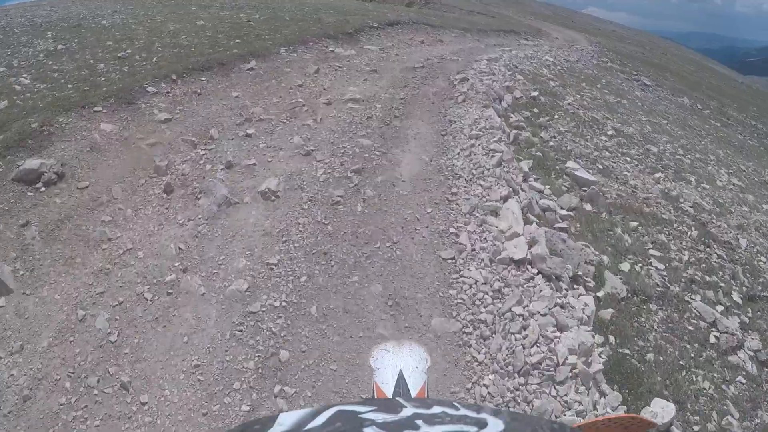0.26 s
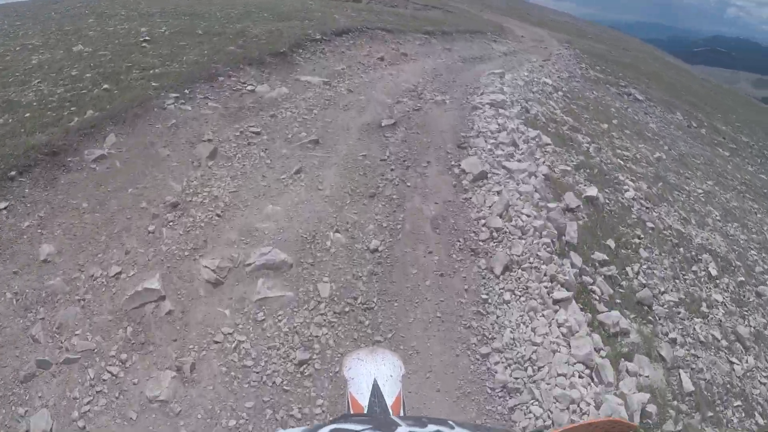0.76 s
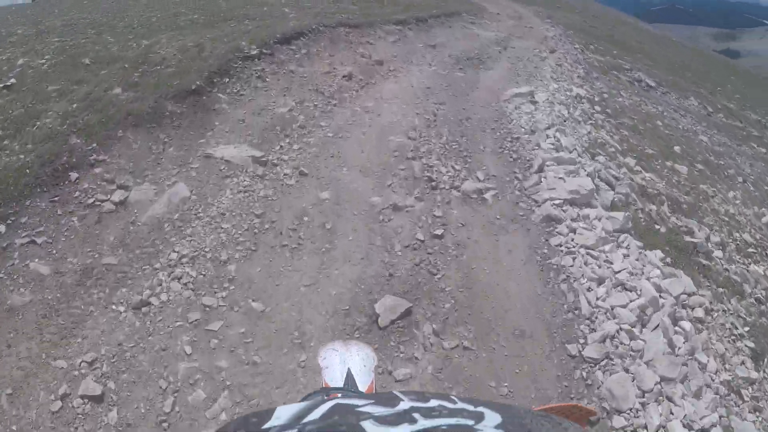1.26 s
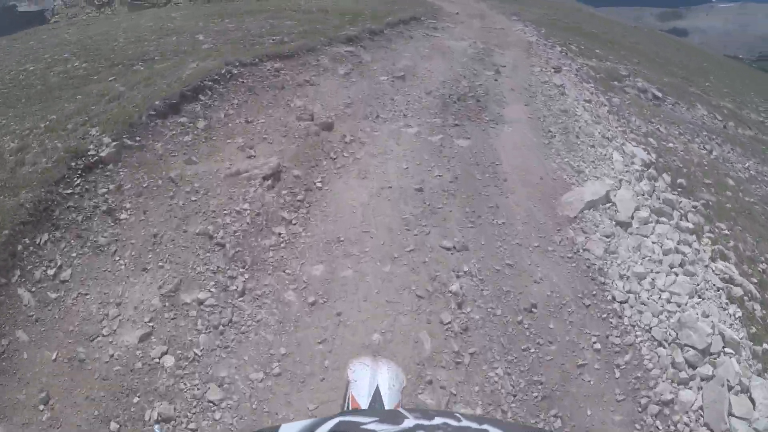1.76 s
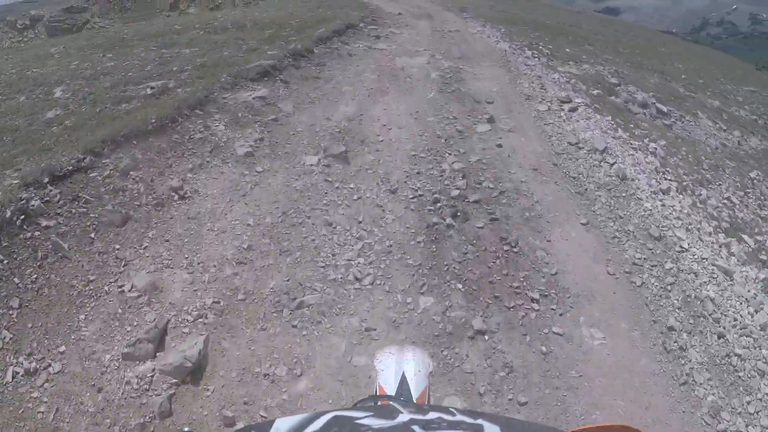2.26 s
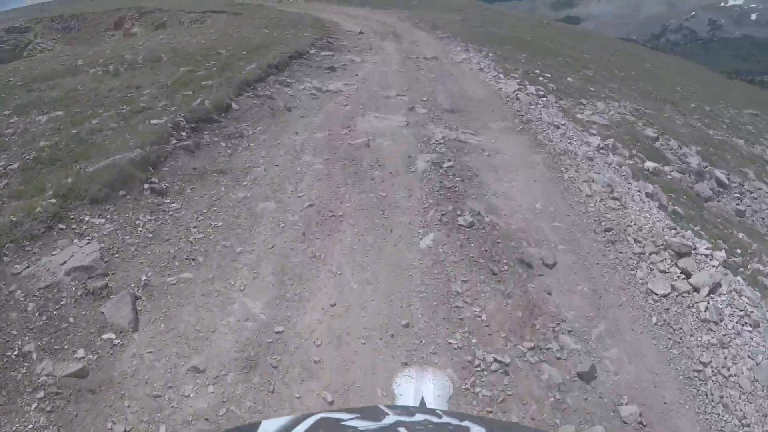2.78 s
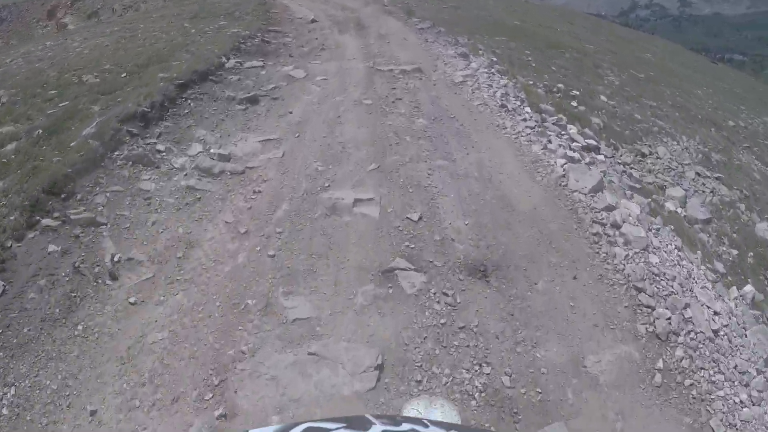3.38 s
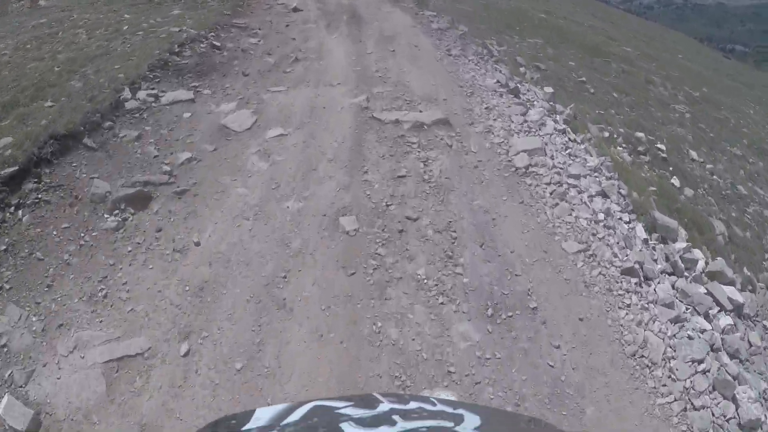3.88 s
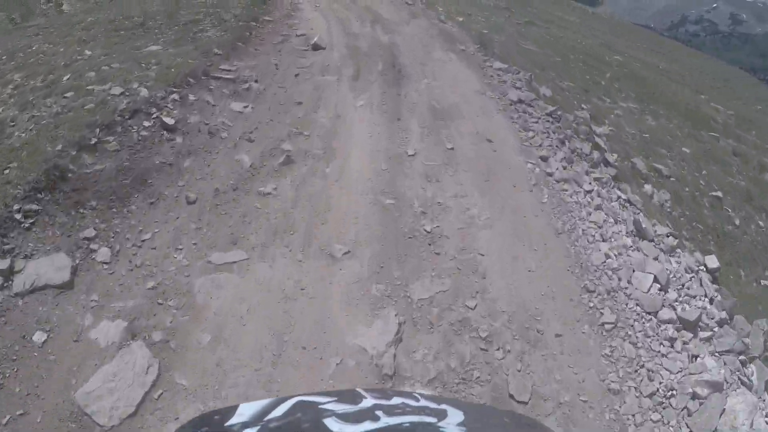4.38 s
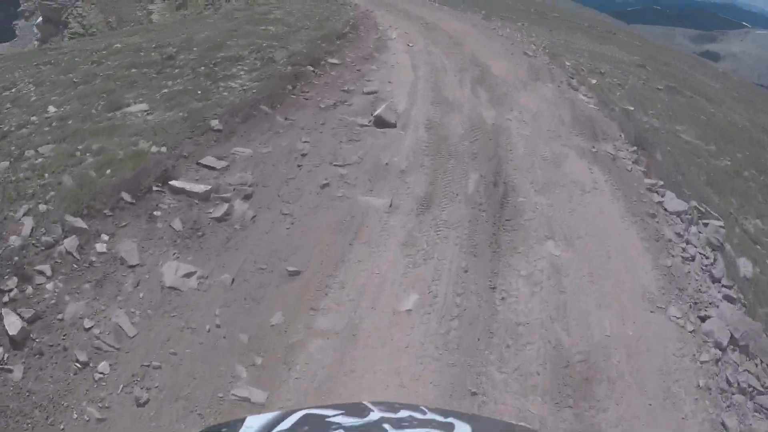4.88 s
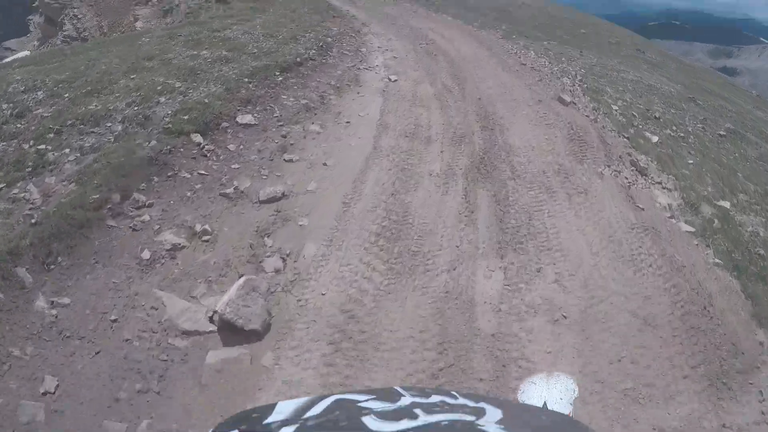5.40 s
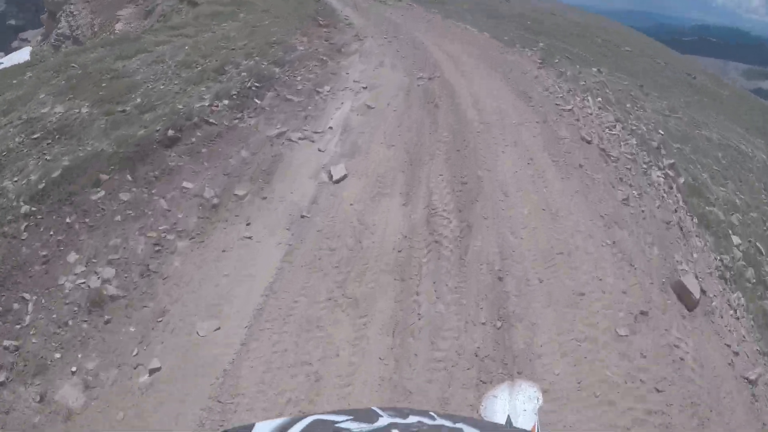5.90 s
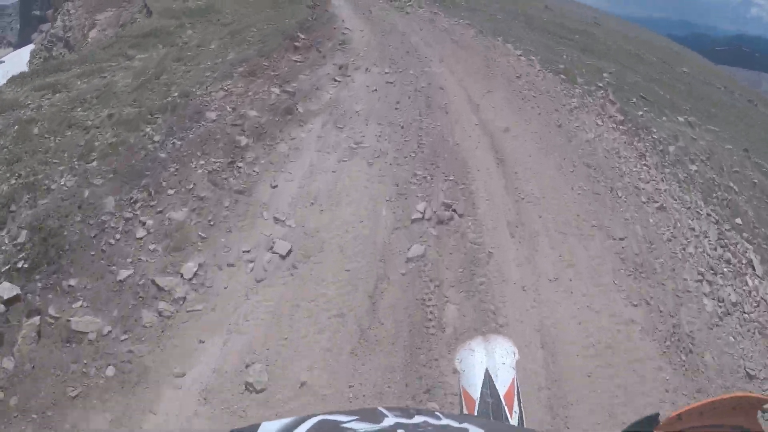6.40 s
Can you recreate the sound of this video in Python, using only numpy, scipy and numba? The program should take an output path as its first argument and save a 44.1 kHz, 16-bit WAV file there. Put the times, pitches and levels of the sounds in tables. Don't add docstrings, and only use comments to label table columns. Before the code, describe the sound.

A single-cylinder two-stroke dirt bike runs at part throttle, firing in short broken bursts with sharp little exhaust cracks. It sags and thins around the middle, then catches and climbs into a cleaner, higher buzz. Wind rumbles against a housed microphone carried on the rider, outdoors, close and dry without echo.

```python
import sys
import numpy as np
from scipy import signal
from scipy.fft import rfft, irfft
from scipy.io import wavfile
from scipy.ndimage import uniform_filter1d
from numba import njit

SR = 44100
rng = np.random.default_rng(int(sys.argv[2]) if len(sys.argv) > 2 else 0)


def bounce(signal):
    frames = np.transpose(np.atleast_2d(signal))
    limited = np.clip(frames, -1, 1)
    pcm = np.round(limited * 32767).astype(np.int16)
    wavfile.write(sys.argv[1], SR, pcm)


def invert_db(level):
    return 10 ** (np.asarray(level, dtype=float) / 20)


N = 293265


def level(x, db):
    return x * invert_db(db) / np.sqrt(np.mean(x ** 2))


def curves(table):
    s, *columns = np.transpose(table)
    return [np.interp(np.arange(N) / SR, s, c) for c in columns]


@njit
def svf(x, hz, width_hz):
    y = np.empty(len(x))
    band_state, low_state = 0., 0.
    for i in range(len(x)):
        g = np.tan(np.pi * hz[i] / SR)
        damping = width_hz[i] / hz[i]
        v = (band_state + g * (x[i] - low_state)) / (1 + g * (g + damping))
        band_state = 2 * v - band_state
        low_state += 2 * g * v
        y[i] = damping * v
    return y


def twice(x, hz, width_hz):
    return svf(svf(x, hz, width_hz), hz, width_hz)


def band(x, hz, width_hz):
    return svf(x, np.full(N, 1. * hz), np.full(N, 1. * width_hz))


def colour(x, points):
    hz, db = np.transpose(points)
    bins_hz = np.maximum(np.arange(N // 2 + 1) * SR / N, 1)
    gain = invert_db(np.interp(np.log(bins_hz), np.log(hz), db))
    return irfft(rfft(x) * gain, N)


def walk(rate_hz):
    hold = int(SR / rate_hz)
    held = np.repeat(rng.standard_normal(N // hold + 1), hold)
    return 1.17 * uniform_filter1d(uniform_filter1d(held, hold), hold)[:N]


def add(track, s, size):
    place = np.clip(s * SR, 0, N - 2)
    whole = place.astype(int)
    np.add.at(track, whole, size * (1 - place + whole))
    np.add.at(track, whole + 1, size * (place - whole))


def engine(bare_db=-11):
    # t/s, f/Hz
    crank_speed = [(0.0, 72.3), (0.3, 75.1), (0.39, 69.9), (0.63, 68.4), (0.7, 65.4), (0.83, 67.6),
                   (0.93, 65), (1.22, 68.5), (1.28, 67), (1.7, 63.93), (2.09, 66.3), (2.22, 65.9),
                   (2.52, 72.5), (2.68, 72.3), (2.76, 76.1), (2.85, 72.2), (2.91, 66.4), (3.15, 64.8),
                   (3.43, 63.6), (3.56, 67.6), (3.68, 63), (3.83, 63.5), (3.98, 65), (4.17, 62.9),
                   (4.41, 67.4), (4.5, 67.5), (4.56, 64.9), (4.7, 62.85), (4.74, 65.4), (4.81, 74.33),
                   (4.85, 77.15), (4.93, 75.35), (5.02, 70.75), (5.09, 69.86), (5.11, 69.97), (5.18, 79.1),
                   (5.39, 76.7), (5.48, 79.5), (5.56, 76.2), (5.61, 77.5), (5.98, 97), (6.04, 100.1),
                   (6.13, 97.1), (6.35, 99.3), (6.45, 105.4), (6.54, 97.3), (6.65, 90.2)]
    # t/s, load/dB, second order/dB, fourth order/dB, air box/dB, silencer/dB
    crank_load = [(0.0, -16, -15, -11.5, -8, -17), (0.63, -8, -11.5, -8, -8, -11.5),
                  (1.2, -7, -21.5, -15, -18.5, -18), (1.26, -21, -6, -12, -15, -20),
                  (1.3, -10, -15.5, -12.5, -16, -21), (1.33, -25.5, -15, -16, -11, -19),
                  (1.44, -8.5, -18, -4.5, -14.5, -19.5), (2.74, -7, -13, -17, -8.5, -13.5),
                  (2.91, -23, 2, -20, -22, -24), (2.96, -14, -17, -12, -11, -19),
                  (3.06, -18, -14, -10, -8, -6), (3.76, -22, -11, -10, -19, -10),
                  (3.89, -13, -11, -2.5, -12, -11.5), (3.93, -23, -11, -10, -18, -18),
                  (3.94, -11, -13, -6, -17, -13), (4.13, -18, -13, -15, -20, -10),
                  (4.2, -10.5, -15.5, -7, -12, -11.5), (4.56, -12, -16.5, -5.5, -10.5, -12.5),
                  (4.83, -11, -9.5, -21.5, -20, -15.5), (5.67, -14, -8.5, -14, -18.5, -12.5),
                  (5.93, -6.5, -10, -17.5, -20.5, -21), (6.08, -12.5, -8, -13.5, -19.5, -13.5),
                  (6.31, -6, -9, -18, -20, -19.5), (6.5, -10.5, -8.5, -16, -20, -13.5),
                  (6.65, -16, -13, -9.5, -20, -23)]
    # f/Hz, width/Hz, level/dB
    chamber_modes = [(598, 48, -7.5), (762, 85, -3.5), (884.5, 61, -3)]
    box_hz, box_width_hz = 468, 45

    hz, = curves(crank_speed)
    load_db, second_db, fourth_db, box_db, silencer_db = curves(crank_load)
    fired, bare, gate = turns(hz)
    unit = SR / hz
    both = (fired + invert_db(bare_db) * bare) * unit
    fired = fired * unit

    third = twice(both, 3 * hz, 0.68 * hz)
    second = twice(both, 2 * hz, 1.0 * hz)
    fourth = twice(both, 4 * hz, 0.77 * hz)
    fifth = twice(both, 5 * hz, 0.62 * hz)
    pipe = third - invert_db(second_db) * second - invert_db(fourth_db) * (fourth - invert_db(-5.5) * fifth)

    shake = invert_db(-15) * twice(fired + invert_db(-7) * bare * unit, hz, .6 * hz)
    box = invert_db(box_db) * band(band(fired, box_hz, box_width_hz), box_hz, 3 * box_width_hz)
    chambers = 0
    for k, (f, width_hz, db) in enumerate(chamber_modes):
        ring = band(band(fired, f, width_hz), f, 2.0 * width_hz)
        chambers = chambers + (-1) ** k * invert_db(db) * ring

    load = invert_db(0.35 * (load_db + 8) - 7)
    return load * ((0.65 + 0.78 * gate) * pipe + shake + box + invert_db(silencer_db) * chambers)


def turns(hz, lead_s=0.00202, jitter_s=.0001, scatter_db=2.05, close_s=.005):
    # t/s, length/s, pipe level/dB
    fired_runs = [(0.0004, 0.051, -7), (0.0783, 0.036, -6), (0.135, 0.035, -9.5), (0.1878, 0.031, -10),
                  (0.257, 0.03, -11), (0.3135, 0.035, -9), (0.377, 0.025, -7.5), (0.446, 0.01, -7.5),
                  (0.4654, 0.03, -9), (0.535, 0.044, -12.5), (0.6245, 0.022, -9), (0.6775, 0.025, -9),
                  (0.713, 0.038, -10.5), (0.772, 0.014, -10), (0.8028, 0.084, -11.5), (0.908, 0.015, -5),
                  (0.9386, 0.057, -8), (1.0153, 0.035, -6.5), (1.0617, 0.05, -5.5), (1.1348, 0.029, -5.5),
                  (1.1787, 0.036, -8.5), (1.288, 0.029, -5), (1.3793, 0.019, -3), (1.4324, 0.007, -7),
                  (1.4434, 0.03, -11), (1.506, 0.036, -8), (1.564, 0.014, -3), (1.5965, 0.027, -7),
                  (1.644, 0.021, -6.5), (1.6897, 0.024, -5), (1.7366, 0.11, -8.5), (1.864, 0.103, -7),
                  (1.9823, 0.034, -5), (2.03, 0.103, -7.5), (2.151, 0.03, -6.5), (2.1928, 0.036, -6),
                  (2.2402, 0.024, -6), (2.2867, 0.026, -6.5), (2.3195, 0.037, -5.5), (2.3717, 0.185, -7.5),
                  (2.5757, 0.022, -2.5), (2.636, 0.029, -7.5), (2.672, 0.035, -8.5), (2.7268, 0.033, -10),
                  (2.788, 0.011, -6), (2.949, 0.035, -7), (3.0226, 0.022, -8), (3.21, 0.02, -7.5),
                  (3.3075, 0.011, -16), (3.5034, 0.016, -6), (3.835, 0.052, -11.5), (3.9428, 0.034, -7.5),
                  (4.0012, 0.017, -25), (4.065, 0.028, -14.5), (4.193, 0.027, -10), (4.2414, 0.02, -5),
                  (4.3025, 0.027, -8), (4.3587, 0.04, -8.5), (4.4167, 0.044, -10), (4.481, 0.032, -9.5),
                  (4.5417, 0.014, -6.5), (4.5716, 0.023, -7), (4.618, 0.107, -8), (4.7446, 0.036, -4.5),
                  (4.7872, 0.694, -7.5), (5.4878, 0.029, -7), (5.5287, 0.016, -4), (5.5515, 0.032, -6.5),
                  (5.595, 0.49, -6.5), (6.0923, 0.307, -9), (6.407, 0.084, -11.5), (6.5036, 0.043, -12),
                  (6.6125, 0.015, -10.5)]
    t, angle = np.arange(N) / SR, np.cumsum(hz) / SR
    fired, bare, gate = np.zeros(N), np.zeros(N), np.zeros(N)
    chance = rng.standard_normal((len(fired_runs), 100, 2))
    starts = [row[0] - lead_s for row in fired_runs] + [N / SR]
    for k, (s, long_s, db) in enumerate(fired_runs):
        first, last = np.interp(starts[k:k + 2], t, angle)
        count = max(np.rint(last - first), 1)
        when = np.interp(first + np.arange(count), angle, t)
        late, size = chance[k, :len(when)].T
        lit = when < s + max(long_s - .009, 0)
        even = 1 / (1 + long_s / 0.21)
        add(fired, (when + even * jitter_s * late)[lit], invert_db(db + even * scatter_db * size)[lit])
        add(bare, (when + 6 * jitter_s * late)[~lit], invert_db(db + 5.4 * size)[~lit])
        opens_s = max(starts[k] - close_s / 2, 0)
        gate[int(opens_s * SR):int((s + long_s) * SR)] = 1
    return fired, bare, uniform_filter1d(gate, max(int(close_s * SR), 1))


def cracks(decay_s=.016, snap_s=0.0034, snap=0.51, rise_s=0.00065):
    # t/s, peak/dB
    relights = [(0.0761, -23), (0.1313, -24), (0.2015, -27), (0.3643, -32.5), (0.414, -25), (0.5282, -24.5),
                (0.617, -27), (0.6838, -19), (0.7442, -25), (0.8, -24.5), (0.9046, -24.5), (0.9356, -25),
                (1.0293, -26.5), (1.0566, -21.5), (1.1206, -24), (1.3766, -22.5), (1.5163, -21.5),
                (1.5617, -21), (1.6074, -27), (1.654, -20), (1.747, -21.5), (1.8008, -26), (1.8723, -27),
                (1.981, -22.5), (2.0258, -25), (2.0707, -26), (2.1183, -36.5), (2.148, -27.5),
                (2.1931, -21.5), (2.2378, -25.5), (2.2825, -24.5), (2.3263, -22), (2.375, -25),
                (2.4842, -23), (2.6311, -24.5), (2.6764, -23.5), (2.9623, -21.5), (3.0235, -22),
                (3.2064, -23.5), (3.334, -29), (3.3638, -29.5), (3.541, -27.5), (3.7924, -28.5),
                (3.8453, -24), (3.923, -23.5), (3.9545, -18.5), (3.9847, -23), (4.151, -26),
                (4.2094, -21.5), (4.2505, -24), (4.4178, -16.5), (4.4878, -23), (4.5344, -19.5),
                (4.582, -25.5), (4.6269, -22.5), (4.7724, -21), (4.9072, -24.5), (4.9417, -22.5),
                (5.0533, -26), (5.2028, -24.5), (5.4654, -29.5), (5.5297, -23), (6.0287, -24.5),
                (6.535, -25.5)]
    # f/Hz, level/dB
    gas_spectrum = [(300, -18.5), (500, 4), (950, -11.5), (1100, -14), (2500, -15.5), (6300, -29),
                    (7100, -42), (9200, -45), (12500, -67)]
    t = np.arange(4096) / SR
    hits = np.zeros(N)
    s, peak_db = np.array(relights).T
    add(hits, s, invert_db(peak_db))
    puff = (1 - np.exp(-t / rise_s)) * (np.exp(-t / decay_s) + snap * np.exp(-t / snap_s))
    gas = level(colour(rng.standard_normal(N), gas_spectrum), -0.58)
    return gas * signal.fftconvolve(hits, puff)[:N]


def rattles():
    # t/s, length/s, f/Hz, width/Hz, level/dB
    loose_parts = [
        (4.554, 0.27, 1600, 50, -27),
        (4.816, 0.22, 1850, 60, -38),
        (5.04, 0.086, 1820, 50, -37),
        (5.084, 0.099, 1400, 89, -33),
        (5.45, 0.31, 1490, 90, -40),
        (6.25, 0.38, 1410, 80, -33.5),
        (4.5, .3, 910, 90, -32.5),
    ]
    t = np.arange(N) / SR
    out = 0
    for s, long_s, f, width_hz, db in loose_parts:
        ring = band(band(rng.standard_normal(N), f, width_hz), f, width_hz)
        swell = np.sin(np.pi * np.clip((t - s) / long_s, 0, 1))
        out = out + level(ring, db) * invert_db(2.2 * walk(25)) * swell
    return out


def wind():
    # t/s, buffet/dB, rush/dB, whistle/dB, hiss/dB
    gust_levels = [(0.0, -45, -25, -27, -35), (0.03, -37, -25, -38.5, -45.5),
                   (0.16, -32.5, -24, -32, -43.5), (0.48, -32, -22, -30, -41),
                   (0.52, -36.5, -20, -29, -44.5), (0.7, -31.5, -24, -25.5, -43.5),
                   (0.94, -35, -27, -39, -44.5), (1.11, -37, -19.5, -32.5, -44),
                   (1.37, -32.5, -34, -37, -43.5), (1.67, -40.5, -30.5, -34.5, -43),
                   (1.85, -30, -26.5, -40, -42), (2.09, -38.5, -27, -40, -42),
                   (2.37, -39.5, -28.5, -38.5, -45.5), (2.44, -38.5, -18.5, -41, -40.5),
                   (2.94, -38, -30, -35.5, -44.5), (3.0, -38, -29.5, -37.5, -43),
                   (3.58, -34.5, -25, -32, -39.5), (3.61, -42, -26, -28.5, -41),
                   (3.89, -29.5, -26, -29, -39.5), (4.35, -33.5, -23, -29, -35.5),
                   (4.54, -33, -30, -30, -39.5), (4.63, -49, -24.5, -34.5, -37),
                   (4.78, -33.5, -21.5, -30.5, -36), (5.3, -44.5, -26.5, -38, -41.5),
                   (5.43, -31, -32.5, -37.5, -39.5), (5.78, -42.5, -32, -33.5, -42),
                   (6.43, -39.5, -29, -33, -36.5), (6.48, -31.5, -31, -30.5, -38.5),
                   (6.65, -33.5, -23, -33.5, -40)]
    gust_hz = [60, 600, 1500, 4000]
    # f/Hz, density/dB per Hz
    wind_spectrum = [(15, -44.5), (28, -14), (64, -4.5), (97, -8), (145, -1), (240, -3), (344, -10),
                     (600, -15.5), (950, -17), (1080, -22), (3000, -33.5), (6200, -44.5), (7100, -55.5),
                     (9200, -58), (12000, -78), (13500, -100)]
    ref_s, wind_db = 3.28, -20.5

    gusts = [g - g[int(ref_s * SR)] for g in curves(gust_levels)]
    flutter = [walk(14) for _ in gusts]
    out = 0
    for hz in 25 * 2 ** np.arange(0, 9.2, 1 / 3):
        share = [np.interp(np.log(hz), np.log(gust_hz), row) for row in np.eye(len(gusts))]
        db = sum(w * (g + 1.2 * f) for w, g, f in zip(share, gusts, flutter))
        db = db + 1.1 * walk(22)
        out = out + invert_db(db) * band(rng.standard_normal(N), hz, hz / 4)
    steady_rms = np.sqrt(np.mean(colour(rng.standard_normal(N), wind_spectrum) ** 2))
    return colour(out, wind_spectrum) / steady_rms * invert_db(wind_db)


def scene():
    return (engine() + cracks() + rattles() + wind())[None]


def low_pass(x):
    return signal.sosfilt(signal.butter(12, 14150, fs=SR, output="sos"), x)


def record(dry):
    ceiling = .95
    drive = dry / ceiling
    limited = ceiling * np.tanh(drive + .25 * drive ** 3)
    return low_pass(limited)


dry = scene()
out = record(dry)
bounce(out)
```